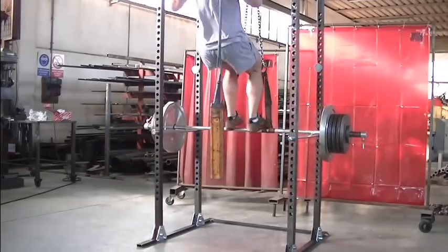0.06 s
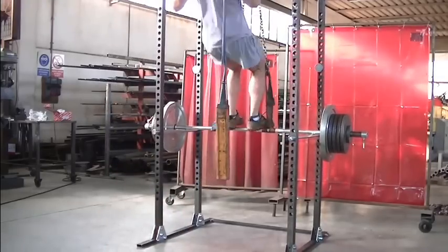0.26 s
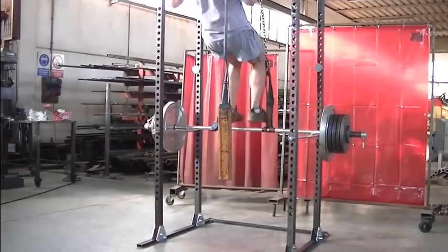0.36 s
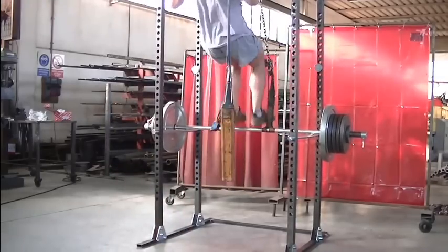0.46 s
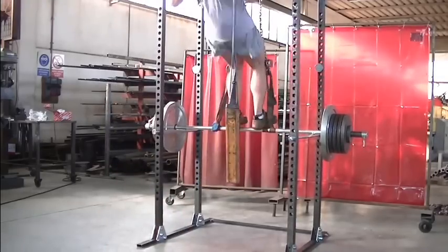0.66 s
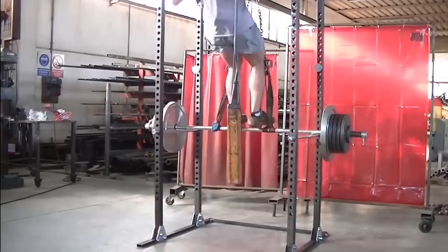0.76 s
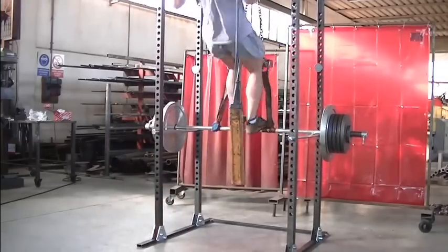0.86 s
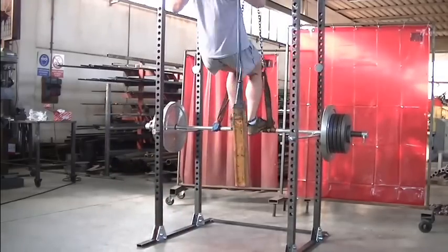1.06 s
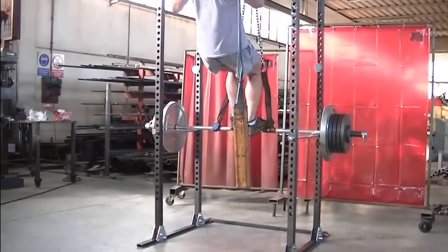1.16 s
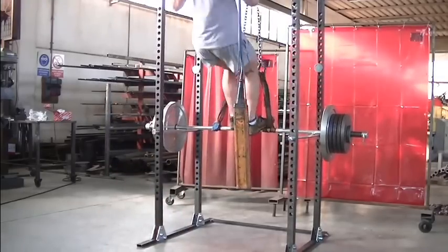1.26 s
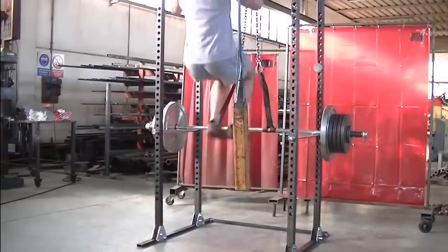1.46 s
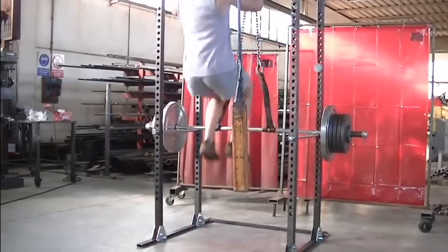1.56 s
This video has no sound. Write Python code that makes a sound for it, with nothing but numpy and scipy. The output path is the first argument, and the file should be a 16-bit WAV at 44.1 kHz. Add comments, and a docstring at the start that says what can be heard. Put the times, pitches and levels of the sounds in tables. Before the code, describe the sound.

A loaded barbell knocks against a steel rack at about 0.2 seconds, a dull thud with a bright clash and a brief plate rattle. A harder, sharper clash follows at 0.65 seconds. Plates chatter and loose hardware clinks until about 1 second, while the steel rings and fades in a large, echoing workshop. A faint ping comes near 1.4 seconds, over quiet, steady background noise.

```python
"""In a large, echoing workshop, a loaded barbell is bumped twice against a steel rack.
Each impact gives a dull thud, then a clash of steel on steel, a dense train of brief contacts.
The plates chatter on, loose hardware clinks, and bar and rack ring in their damped normal modes.
The hall's reverberation draws it all out into a long wash over faint steady noise, heard in mono."""
import sys
import numpy as np
from scipy import signal
from scipy.fft import rfft, irfft
from scipy.io import wavfile

SR = 44100
rng = np.random.default_rng(int(sys.argv[2]) if len(sys.argv) > 2 else 0)


def dump(signal):
    """Clip the signal to [-1, 1] and save it as 16-bit WAV at the path in sys.argv[1]."""
    limited = np.clip(np.atleast_2d(signal).T, -1, 1)
    pcm = np.round(limited * 32767).astype(np.int16)
    wavfile.write(sys.argv[1], SR, pcm)


N = 70560
T = np.arange(N) / SR


# steel meets steel: (time [s], level [dB], swell [s], decay [s], tilt [dB/octave], resonance [Hz])
CLASH_BURSTS = [(0.201, -17, 0.029, 0.022, 0.5, 3500), (0.233, -18.5, 0.0097, 0.016, 0.6, 5820),
                (0.637, -17, 0.014, 0.021, 0, 4400)]
# spectrum of a clash: (frequency [Hz], relative level [dB])
CLASH_SPECTRUM = [(30, -39), (60, -20.5), (130, -13.5), (500, -13), (1200, 0.5), (1650, -2), (2100, 5.5),
                  (3000, -1.5), (4400, -0.5), (6000, -5.5), (7200, -10.5), (10000, -11.5), (15500, -23)]

def clashes():
    """Impact excitation: bar, hooks and plates collide in bursts of contacts that drive a resonance."""
    out = np.zeros(N)
    for start, db, swell, decay, tilt, hz in CLASH_BURSTS:
        burst = from_db(db) * envelope(start, swell, 0, decay) * contacts(per_s=5000, spread_db=1.5)
        out += resonate(colour(burst, CLASH_SPECTRUM, tilt), hz)
    return out


# spectrum of the hardest blow: (frequency [Hz], relative level [dB])
CRACK_SPECTRUM = [(200, -34), (1500, -19), (3000, -16), (4400, -3), (6000, -5), (8000, -23), (11000, -33),
                  (16000, -28)]

def crack(start_s=0.6494, rebound_s=0.001):
    """A short impulse has a broad spectrum: one hard blow and its weaker, instant rebound."""
    clicks = np.zeros(N)
    clicks[int(start_s * SR)] = from_db(8)
    clicks[int((start_s + rebound_s) * SR)] = from_db(4)
    return colour(clicks, CRACK_SPECTRUM)


# the bar is shoved against the rack: (time [s], level [dB], swell [s], decay [s], tilt [dB/octave])
THUD_BURSTS = [(0.193, -25, 0.0028, 0.075, 3.3), (0.628, -17, 0.0072, .011, 0.6)]
# spectrum of a thud: (frequency [Hz], relative level [dB])
THUD_SPECTRUM = [(40, -23), (85, -21), (130, -0.5), (200, -3), (270, 0), (360, 2), (500, 0.5), (720, 2.5),
                 (1400, -12), (3000, -23), (8000, -34), (16000, -50)]

def thuds():
    """Forced response: the heavy push of the bar draws a dull burst of noise from the frame."""
    out = np.zeros(N)
    for start, db, swell, decay, tilt in THUD_BURSTS:
        push = from_db(db) * envelope(start, swell, 0, decay) * contacts(per_s=6700, spread_db=4)
        out += colour(push, THUD_SPECTRUM, tilt)
    return out


# spells of plate chatter: (time [s], level [dB], hold [s], decay [s])
RATTLE_SPELLS = [(0.166, -39, 0.0057, .02), (0.28, -23, 0.042, 0.083), (0.715, -24, 0.16, 0.22),
                 (1.373, -54, 0.039, .02)]
# spectrum of a plate: (frequency [Hz], relative level [dB])
RATTLE_SPECTRUM = [(60, -27.5), (150, -16.5), (500, -13.5), (1200, -3.5), (1700, -3), (2020, 2),
                   (2600, 0.5), (3600, -5.5), (4120, -4), (4330, -2), (4560, -8), (5400, -10), (6500, -15),
                   (10000, -35.5), (15500, -41)]

def plate_rattle(swell_s=0.016):
    """Intermittent contact: a plate chatters on its sleeve until it settles."""
    shake = sum(from_db(db) * envelope(start, swell_s, hold, decay)
                for start, db, hold, decay in RATTLE_SPELLS)
    return colour(shake * contacts(per_s=200, spread_db=3.5), RATTLE_SPECTRUM)


def plates_in_hall(count=3):
    """Incoherent addition: independent plates, each with its own echoes, sum in power."""
    return sum(in_hall(plate_rattle(), direct_db=-3.5, hall_db=-1.5) for _ in range(count)) / np.sqrt(count)


# the two knocks that set bar and rack ringing: (time [s], level [dB])
KNOCKS = [(.215, -6.5), (0.646, -4)]
# modes of bar and rack: (frequency [Hz], level re first knock [dB], level re second knock [dB], T60 [s])
STEEL_MODES = [(1035, -40, -40, 2.7), (1192, -29, -31, 1.2), (1339, -42, -40, 2.8), (1862, -24, -25, 1.6),
               (1889, -34, -32, 1.7), (1936, -26, -31, 1.6), (1979, -38, -30, 1.5), (2036, -30, -28, 1.8),
               (2081, -35, -28, 1.7), (2197, -33, -30, 1.6), (2287, -25, -36, 1.2), (2486, -27, -29, 1.1),
               (2582, -28, -34, 1.1), (3016, -31, -32, 1.2), (3119, -38, -27, 1.4), (3467, -26, -38, .6),
               (4046, -29, -29, 1.1), (4310, -30, -30, 1.2), (4336, -35, -22, 1.0), (5788, -29, -36, .7),
               (5862, -30, -38, .7)]

def ringing(swell_s=0.037, waver_depth=0.3, waver_hz=7):
    """Free vibration: bar and rack ring in damped modes, each wavering on its way through the hall."""
    out = np.zeros(N)
    lowpass = signal.butter(2, waver_hz, fs=SR, output="sos")
    for hz, *levels_db, t60 in STEEL_MODES:
        for (start, knock_db), mode_db in zip(KNOCKS, levels_db):
            drift = signal.sosfilt(lowpass, rng.standard_normal((2, N)))
            in_phase, quadrature = waver_depth * drift / drift.std()
            phase = 2 * np.pi * (hz * T + rng.random())
            tone = (1 + in_phase) * np.sin(phase) + quadrature * np.cos(phase)
            out += from_db(knock_db + mode_db) * envelope(start, swell_s, 0, t60 / np.log(1000)) * tone
    return out


# loose hardware is jolted: (time [s], level [dB])
CLINK_JOLTS = [(0.121, -52), (0.16, -51), (0.367, -28), (0.504, -31), (0.522, -56), (0.664, -20),
               (0.72, -26), (0.79, -24.5), (0.913, -23.5), (0.925, -45), (0.951, -49), (0.995, -64),
               (1.07, -62), (1.238, -54)]
# spectrum of a clink: (frequency [Hz], relative level [dB])
CLINK_SPECTRUM = [(200, -43), (2000, 3.5), (5000, 3.5), (8500, 5), (10500, 0), (12500, -4), (15500, -13)]

def clinks(swell_s=0.0095, decay_s=0.016, ring_t60_s=0.029, ring_db=-3, mode_count=90):
    """Small bodies have high natural frequencies: loose steel parts touch and ring briefly."""
    jolts = sum(from_db(db) * envelope(start, swell_s, 0, decay_s) for start, db in CLINK_JOLTS)
    touches = jolts * contacts(per_s=2500, spread_db=3.5)
    mode_hz = rng.uniform(4000, 15500, (mode_count, 1))
    age = T[:SR // 5]
    ring = np.sin(2 * np.pi * mode_hz * age).sum(axis=0) * np.exp(-np.log(1000) * age / ring_t60_s)
    jingle = convolve(touches, ring / np.linalg.norm(ring))
    return colour(touches + from_db(ring_db) * jingle, CLINK_SPECTRUM)


# lone tones of single steel parts: (time [s], frequency [Hz], level [dB], decay [s])
PING_TONES = [(-.03, 1040, -58, .4), (-.03, 1357, -58, .4), (-.03, 1900, -55, .4), (0.467, 5860, -32, .015),
              (1.36, 1341, -40.5, 0.13), (1.36, 1700, -42.5, .08)]

def pings(swell_s=0.012):
    """Damped oscillators: bar and hooks sing faint pure tones, some already sounding at the start."""
    out = np.zeros(N)
    for start, hz, db, decay in PING_TONES:
        tone = np.sin(2 * np.pi * (hz * T + rng.random()))
        out += from_db(db) * envelope(start, swell_s, 0, decay) * tone
    return out


# reverberation time of the hall: (frequency [Hz], T60 [s])
HALL_DECAY = [(100, 1.77), (400, 1.96), (1000, 1.32), (2200, 1.52), (4400, 1.045), (8000, 0.89),
              (14000, 0.41)]

def hall_response(build_s=0.0042):
    """Diffuse field: echoes build up quickly and die sooner in the treble; unit energy."""
    edges_hz = np.geomspace(40, 18000, 19)
    white = rng.standard_normal((2, N))
    echoes = np.zeros(N)
    for k, (low, high) in enumerate(zip(edges_hz, edges_hz[1:])):
        band = signal.sosfilt(signal.butter(2, [low, high], "band", fs=SR, output="sos"), white[k % 2])
        t60 = at_hz(HALL_DECAY, np.sqrt(low * high))
        echoes += band * np.exp(-np.log(1000) * T / t60)
    echoes *= 1 - np.exp(-T / build_s)
    return echoes / np.linalg.norm(echoes)


def in_hall(x, direct_db, hall_db):
    """Direct plus reverberant field: every spot in the hall has its own pattern of echoes."""
    return from_db(direct_db) * x + from_db(hall_db) * convolve(x, hall_response())


# spectrum of the hall's background: (frequency [Hz], relative level [dB])
AMBIENT_SPECTRUM = [(15, -54), (25, -22), (107, -3.5), (144, -2.5), (481, -3), (522, 1.5), (683, -6),
                    (1050, -6), (1410, -4.5), (2170, 0.5), (2420, -1.5), (4030, -8), (6190, -16),
                    (8320, -20), (15400, -26)]

def hall_noise(level_db=-48):
    """Stationary noise: the faint, steady background of the hall."""
    return from_db(level_db) * colour(rng.standard_normal(N), AMBIENT_SPECTRUM)


def contacts(per_s, spread_db):
    """Poisson process: random clicks of either sign, their sizes within +/- spread_db; rms 1."""
    clicks = (rng.random(N) < per_s / SR) * np.sign(rng.standard_normal(N))
    clicks *= from_db(2 * spread_db * rng.random(N))
    return clicks / (clicks.std() + 1e-12)


def envelope(start, swell, hold, decay):
    """Exponential decay after a rounded rise and a hold."""
    age = T - start
    rise = np.sin(np.pi / 2 * np.clip(age / swell, 0, 1)) ** 2
    return rise * np.exp(-np.maximum(age - swell - hold, 0) / decay)


def resonate(x, hz, width_hz=160, gain_db=-0.5):
    """Second-order resonator: adds one narrow peak of the struck part."""
    r = np.exp(-np.pi * width_hz / SR)
    peak = signal.lfilter([1, 0, -1], [1, -2 * r * np.cos(2 * np.pi * hz / SR), r * r], x + 1e-18)
    return x + from_db(gain_db) * (1 - r * r) / 2 * peak


def colour(x, spectrum, tilt=0, size=4096):
    """Minimum-phase filter of unit energy with the given spectrum, tilted in dB per octave."""
    hz = np.maximum(np.fft.rfftfreq(size, 1 / SR), 10)
    gain = from_db(at_hz(spectrum, hz) + tilt * np.log2(hz))
    cepstrum = irfft(np.log(gain))
    # folding the cepstrum onto positive time makes the filter causal
    cepstrum[1:size // 2] *= 2
    cepstrum[size // 2 + 1:] = 0
    response = irfft(np.exp(rfft(cepstrum)))
    return convolve(x, response / np.linalg.norm(response))


def convolve(x, response):
    """Convolution: a signal passes through an impulse response."""
    return signal.fftconvolve(x, response)[:N]


def at_hz(table, hz):
    """Interpolation on a log-frequency axis."""
    table_hz, values = np.transpose(table)
    return np.interp(np.log(hz + 1e-6), np.log(table_hz), values)


def from_db(db):
    """Decibels to amplitude ratio."""
    return 10 ** (np.asarray(db) / 20)


def scene():
    """Superposition: knocks, chatter and ringing over the hall's noise, the same in both channels."""
    mix = (in_hall(thuds(), direct_db=-3, hall_db=-7)
           + in_hall(clashes(), direct_db=3.5, hall_db=1.5)
           + in_hall(crack(), direct_db=-1.5, hall_db=-6)
           + in_hall(clinks(), direct_db=-6, hall_db=-5)
           + plates_in_hall() + ringing() + pings() + hall_noise())
    return np.array([mix, mix])


def record(dry, cutoff_hz=15600):
    """Clipping and band limiting: peaks stop at full scale, then a steep low-pass cuts the top."""
    lowpass = signal.ellip(12, 0.1, 80, cutoff_hz, fs=SR, output="sos")
    return signal.sosfilt(lowpass, np.clip(dry, -1, 1))


dry = scene()
out = record(dry)
dump(out)
```